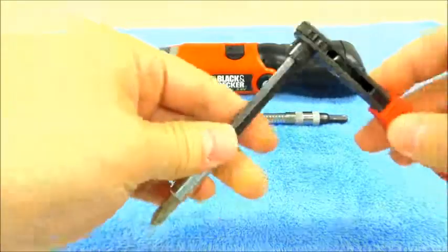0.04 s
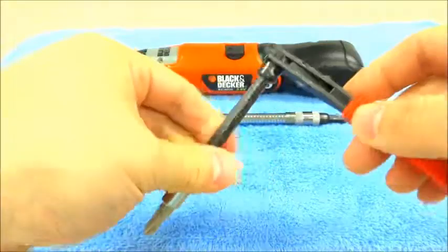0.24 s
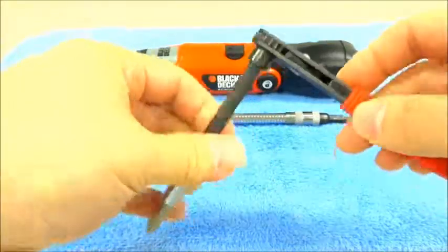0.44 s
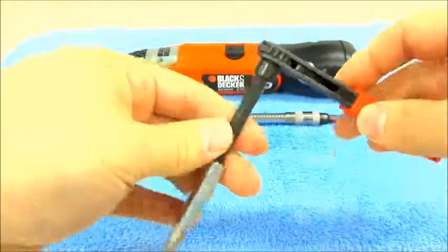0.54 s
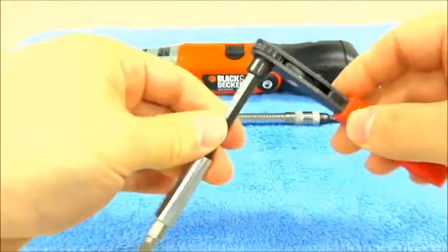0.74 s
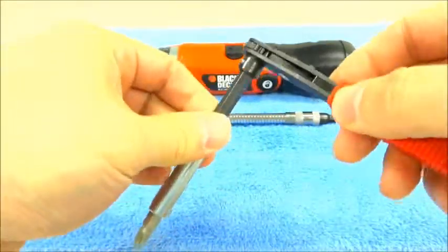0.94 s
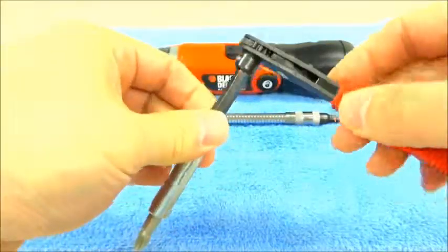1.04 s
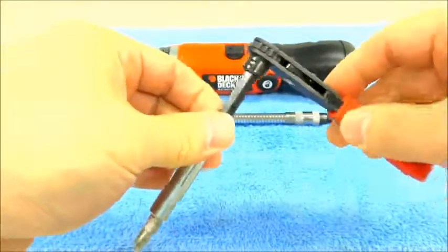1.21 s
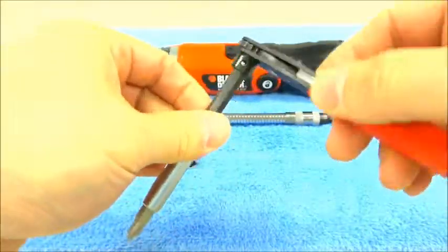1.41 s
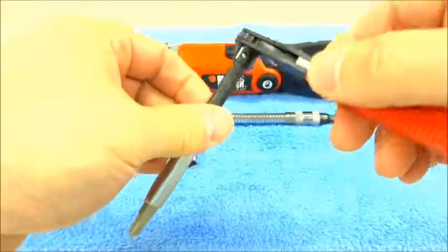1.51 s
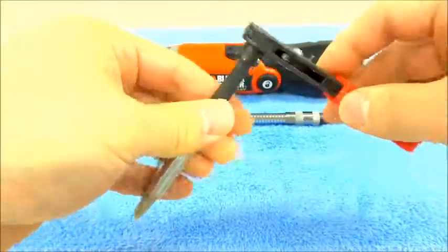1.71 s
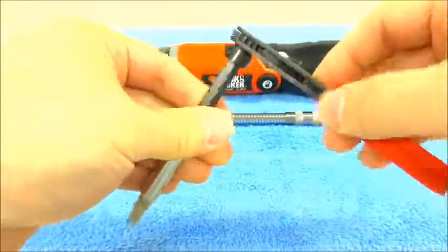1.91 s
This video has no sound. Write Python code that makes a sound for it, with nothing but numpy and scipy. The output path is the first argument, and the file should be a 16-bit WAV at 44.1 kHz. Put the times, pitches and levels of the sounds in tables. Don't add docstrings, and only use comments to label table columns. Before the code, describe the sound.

Rapid bright metallic clicks of a small ratchet turned by hand, over faint fan rumble

```python
import sys
import numpy as np
from scipy import signal
from scipy.fft import rfft, irfft, next_fast_len
from scipy.io import wavfile
from scipy.ndimage import uniform_filter1d

SR = 44100
rng = np.random.default_rng(int(sys.argv[2]) if len(sys.argv) > 2 else 0)


def wrap_up_sound(samples):
    columns = np.atleast_2d(samples).T
    tamed = np.clip(columns, -1, 1)
    steps = np.round(tamed * 32767).astype(np.int16)
    wavfile.write(sys.argv[1], SR, steps)


def volts_from_db(level):
    exponent = np.asarray(level, float) / 20
    return 10 ** exponent


N = 85995
TOP_HZ = 15900


def unit(x):
    return x / np.sqrt(np.mean(x ** 2) + 1e-20)


def along(points, hz):
    f, value = np.transpose(points)
    return np.interp(np.log(hz + 1), np.log(f + 1), value)


def filtered(x, response):
    size = next_fast_len(x.shape[-1] + 8192)
    spectrum = rfft(x, size) * response(np.fft.rfftfreq(size, 1 / SR))
    return irfft(spectrum, size)[..., :x.shape[-1]]


def ring(f, hz, width_hz):
    return 1j * f * width_hz / (hz * hz - f * f + 1j * f * width_hz)


# frequency in Hz, width in Hz, level in dB.
HEAD_RINGS = [(2267, 355, 1.4), (2900, 500, 2.5), (4840, 1980, -1.5), (6630, 810, 4), (8130, 620, -9.5),
              (10100, 320, -9), (11500, 900, -12), (14430, 650, -6), (14900, 1020, -12.5)]
# frequency in Hz, level in dB.
CRACK_TONE = [(1000, -47.5), (1900, -18), (5000, -2.5), (11000, -2), (15500, -10)]


def head_response(f, db, own_hz, low_db):
    body_db, body_top_hz = 9.5, 6080
    softer = 0.35
    body_shelf_db = (body_db + low_db) / (1 + (f / body_top_hz) ** 4)
    dulling_db = softer * db * (f / TOP_HZ) ** 3
    colour = volts_from_db(1.5 + along(CRACK_TONE, f))
    for k, (hz, width_hz, level_db) in enumerate(HEAD_RINGS):
        colour = colour + (-1) ** k * volts_from_db(level_db) * ring(f, hz, width_hz) ** 2
    own_ring = volts_from_db(2) * ring(f, own_hz, 1270)
    return own_ring + volts_from_db(body_shelf_db + dulling_db) * colour


def gritty_burst(ms, length_ms):
    rise_ms, die_ms, lead_db, lead_ms, grit_db = 0.51, 0.76, -16.5, 2, -0.5
    drop = np.clip(ms / rise_ms, 0, 1) ** 2
    swell = volts_from_db(lead_db) * np.exp(np.minimum(ms, 0) / lead_ms)
    shape = (drop + swell) * np.exp(-np.maximum(ms - length_ms, 0) / die_ms)
    grit = volts_from_db(grit_db * unit(uniform_filter1d(rng.standard_normal(len(ms)), size=12)))
    return shape * grit * rng.standard_normal((2, len(ms))), shape


# start in seconds, peak level in dB, brightest ring in Hz,
# burst length in ms, low body level in dB.
PAWL_SNAPS = [(0.2459, 1.5, 12500, 1.9, -19.5), (0.2794, 2, 10600, 1.53, -22.5),
              (0.3042, -0.5, 11500, 1.56, -24), (0.3254, 1.5, 11500, 1.4, -21),
              (0.3411, 0.5, 10100, 2.6, -21), (0.3541, -2.5, 11200, 2.3, -13.5),
              (0.3674, 1, 10800, 0.91, -12.5), (0.3837, 3.5, 11400, 0.61, -19),
              (0.403, -1, 11500, 1.9, -27.5), (0.435, -1.5, 8500, 1.8, -15.5),
              (0.4965, -11, 11100, 1.26, -20), (0.8363, -4, 11800, 1.4, -23),
              (0.845, -4.5, 11500, 2, -17.5), (0.8539, -2, 11500, 1.4, -26), (0.8719, 0, 10550, 1.8, -15.5),
              (0.9154, 0, 10600, 1.14, -17), (0.9416, 0.5, 10800, 1.1, -19), (0.962, 3.5, 7510, 1.3, -22.5),
              (0.9748, -1, 8130, 1.4, -29.5), (0.9956, -1, 7140, 1.2, -19.5), (1.112, -8, 8960, 1.8, -22.5),
              (1.4443, -6.5, 7600, 1.1, -19), (1.4736, -1, 12300, 1.28, -15.5),
              (1.5321, -1, 10900, 1.7, -13.5)]
# start in seconds, peak level in dB, brightest ring in Hz,
# burst length in ms, low body level in dB.
PLAY_TICKS = [(.2205, -25, 12100, 2.2, -22), (0.2295, -28, 8000, 1, -19.5), (0.2352, -10, 11500, 1, -21),
              (0.8186, -25.5, 12040, 1.5, -27), (.825, -28.5, 8000, 2, -10.5),
              (0.8403, -19, 8000, 1.5, -17), (.905, -18, 10400, 2.5, -22), (1.321, -33.5, 8230, 1, -19),
              (1.328, -41, 5000, 1.5, -8.5), (1.3408, -23, 8300, 1, -19), (1.3857, -41, 5500, 1.5, -6),
              (1.409, -29.5, 12100, .8, -29), (1.4328, -34.5, 7000, 1.5, -13.5),
              (1.4402, -25.5, 7900, 1, -21.5), (1.4535, -28, 11840, 3, -21.5),
              (1.4633, -28.5, 13100, 2, -19), (1.4675, -16.5, 8100, .8, -17),
              (1.5045, -19.5, 8530, 3, -10.5), (1.6622, -18, 4960, 1, -18.5), (1.7322, -30, 7900, 1, -14.5),
              (1.929, -19, 8160, 1, -20), (1.9377, -26.5, 3280, 1.5, -11)]


def ratchet():
    trim_db, side_db = -10.5, -17.5
    out = np.zeros((2, N + 1024))
    sent = np.zeros(N)
    ms = (np.arange(1024) - 256) / SR * 1000
    for start_s, db, own_hz, length_ms, low_db in PAWL_SNAPS + PLAY_TICKS:
        burst, shape = gritty_burst(ms, length_ms)
        snap = filtered(burst, lambda f: head_response(f, db, own_hz, low_db))
        snap = snap * np.linalg.norm(shape) / np.linalg.norm(snap[0])
        snap = volts_from_db(db + trim_db) * volts_from_db([[0], [side_db]]) * snap
        begin = round((start_s + ms[0] / 1000) * SR)
        out[:, begin:begin + len(ms)] += snap
        sent[round(start_s * SR)] = np.linalg.norm(snap[0])
    return out[:, :N], sent


# frequency in Hz, level in dB,
# time to fall 60 dB in seconds, width in Hz.
SHAFT_RINGS = [(5170, -51, 0.37, 130), (10967, -40, 0.31, 450), (2319, -50, 0.16, 220)]
# frequency in Hz, time to fall 60 dB in seconds.
WALL_DECAY = [(2000, 0.47), (5300, 0.46), (11000, 0.3), (15500, 0.16)]
# frequency in Hz, level in dB.
WALL_COLOUR = [(1000, -40), (2000, -13.5), (3700, -12.5), (5200, -9), (8000, -6), (11000, -1),
               (13500, -5.5), (16000, -3)]


def wall_tail(size):
    t = np.arange(size) / SR
    hz, frame_s, z = signal.stft(rng.standard_normal((2, size)), SR, nperseg=256)
    decay_db = 60 * frame_s / along(WALL_DECAY, hz)[:, None]
    level_db = along(WALL_COLOUR, hz)[:, None] - decay_db
    tail = signal.istft(z * volts_from_db(level_db), SR, nperseg=256)[1][:, :size]
    tail = volts_from_db(-10) * tail / np.linalg.norm(tail[0])
    for ring_hz, db, t60, width_hz in SHAFT_RINGS:
        drift = np.cumsum(rng.standard_normal(size)) * np.sqrt(2 * np.pi * width_hz / SR)
        tail[0] += volts_from_db(db - 60 * t / t60) * np.sin(2 * np.pi * ring_hz * t + drift)
    delay_ms, rise_ms = 5, 4
    return tail * np.clip((t * 1000 - delay_ms) / rise_ms, 0, 1)


# delay in ms, level in dB.
NEAR_ECHOES = [
    (8.8, -19.5),
    (12.3, -29),
    (25, -32),
    (29, -33),
]


def answer(x, sent):
    size = SR // 2
    tails_follow = 0.43
    walls = np.zeros((2, N + SR))
    lift_db = tails_follow * gain_db()
    for start in np.flatnonzero(sent):
        lift = volts_from_db(lift_db[start:start + size] - lift_db[start])
        walls[:, start:start + size] += sent[start] * wall_tail(size) * lift
    near = np.zeros((2, SR // 20))
    for delay_ms, db in NEAR_ECHOES:
        smear = rng.standard_normal((2, 8)) / np.sqrt(8)
        begin = round(delay_ms * SR / 1000)
        near[:, begin:begin + 8] += volts_from_db(db) * smear
    echoes = signal.fftconvolve(x[None], near, axes=1)[:, :N]
    side_db = -11.5
    return (walls[:, :N] + echoes) * volts_from_db([[0], [side_db]])


# frequency in Hz, likeness from 0 to 1.
LIKENESS = [(40, 0.9), (150, .96), (300, 0.93), (600, 0.63), (1300, 0.61), (3000, 0.43), (12000, 1)]


def rush(gain, patchy_db):
    z = signal.stft(rng.standard_normal((2, N)), nperseg=512)[2]
    field = uniform_filter1d(rng.standard_normal(z.shape[1:]), size=5, axis=0)
    field = uniform_filter1d(field, size=10, axis=1)
    pair = signal.istft(z * volts_from_db(patchy_db * unit(field)), nperseg=512)[1][:, :N]

    def spread(hz):
        angle = np.arccos(np.clip(along(LIKENESS, hz), -1, 1)) / 2
        return gain(hz) * np.array([np.cos(angle), np.sin(angle)])

    mid, side = filtered(pair, spread)
    return unit(np.array([mid + side, mid - side]))


# frequency in Hz, level in dB per Hz.
FAN_RUMBLE = [(15, -61), (25, -34), (91, -19.5), (234, -8), (267, -5), (515, -10), (556, -13.5),
              (1180, -14.5), (2500, -27), (3250, -36), (5500, -120)]
# frequency in Hz, level in dB per Hz.
ROOM_HISS = [(2500, 1.5), (3500, 2.5), (6000, -5.5), (10000, -7), (14500, -11), (16000, -20)]
# frequency in Hz, level in dB, width in Hz.
HUM_LINES = [(122.3, -18.5, 6.3), (238.7, -9, 5.9), (302.4, -18, 11), (525.1, -8.5, 17.5)]


def room_tone():
    hiss_db, whine_hz, whine_db = -10, 13400, -23
    low = rush(lambda f: volts_from_db(along(FAN_RUMBLE, f)), patchy_db=0.5)
    for hz, db, width_hz in HUM_LINES:
        low = low + volts_from_db(db) * rush(lambda f: np.abs(ring(f, hz, width_hz)) ** 2, patchy_db=-3.06)
    hiss = rush(lambda f: volts_from_db(along([(1500, 9)] + ROOM_HISS, f)), patchy_db=1.2)
    whine = rush(lambda f: np.abs(ring(f, whine_hz, 120)) ** 2, patchy_db=-0.3)
    hiss = hiss + volts_from_db(whine_db) * whine
    return volts_from_db(gain_db()[:N]) * (low + volts_from_db(hiss_db) * hiss)


# time in seconds, level in dB.
GAIN_RIDE = [(0, -37), (0.222, -38), (0.282, -46), (.33, -50), (0.446, -50.5), (.47, -45.5), (.66, -44),
             (.72, -45), (0.839, -46), (.93, -50.5), (1.0, -52), (1.04, -45.5), (1.2, -46.5), (1.42, -44.5),
             (1.46, -48), (1.54, -44.5), (1.579, -44), (1.95, -44)]


def gain_db():
    return np.interp(np.arange(N + SR) / SR, *np.transpose(GAIN_RIDE))


def scene():
    tool, sent = ratchet()
    mid, side = tool + answer(tool[0], sent)
    return np.array([mid + side, mid - side]) + room_tone()


def low_pass(x):
    return signal.sosfilt(signal.butter(12, 17150, fs=SR, output="sos"), x)


def record(dry):
    ceiling, over_top_db = 1.1, -32
    held = dry / (1 + np.abs(dry / ceiling) ** 4) ** (1 / 4)
    mix = filtered(held, lambda f: volts_from_db(over_top_db * (f > TOP_HZ)))
    return low_pass(mix)


dry = scene()
out = record(dry)
wrap_up_sound(out)
```